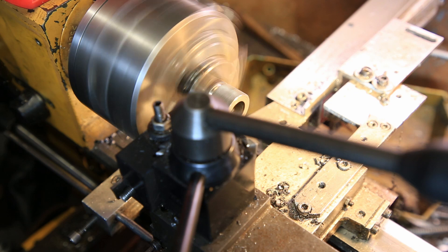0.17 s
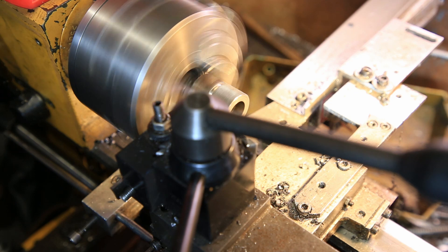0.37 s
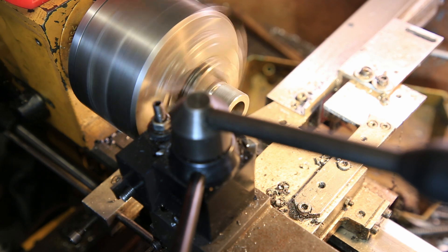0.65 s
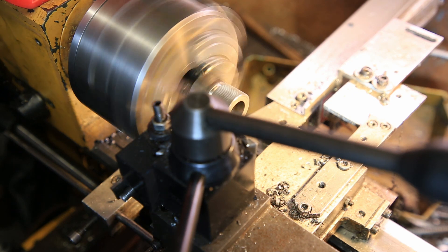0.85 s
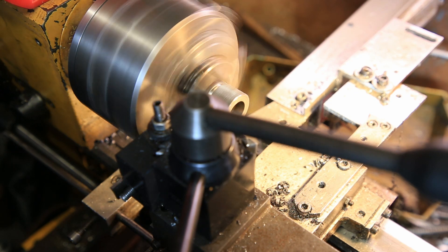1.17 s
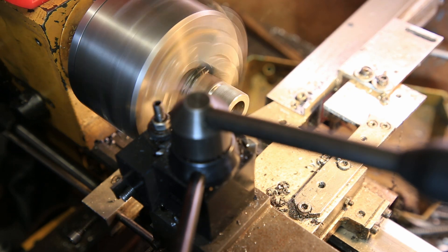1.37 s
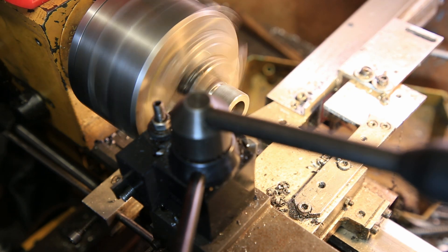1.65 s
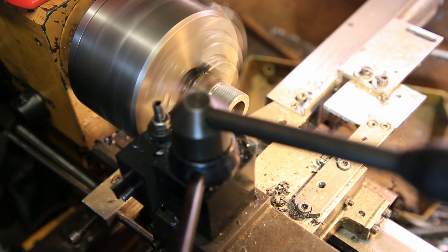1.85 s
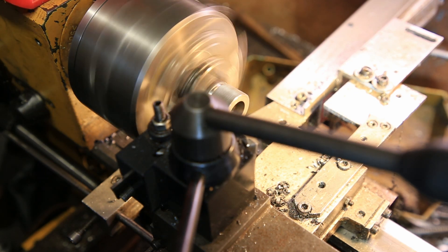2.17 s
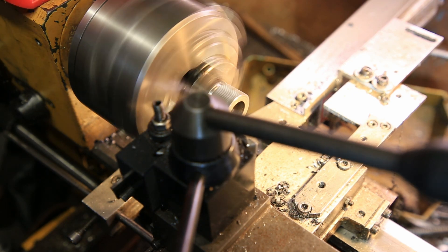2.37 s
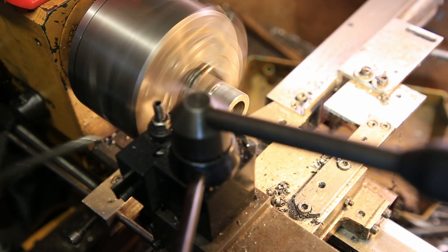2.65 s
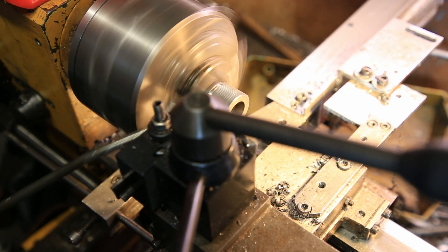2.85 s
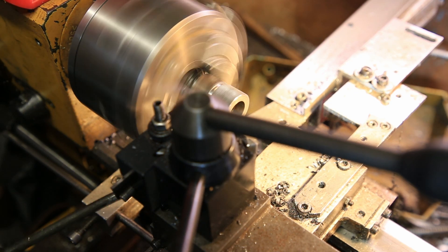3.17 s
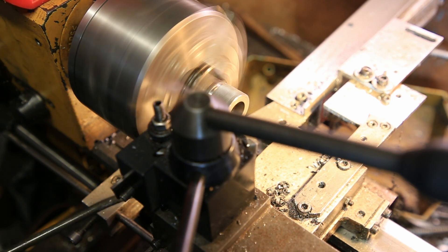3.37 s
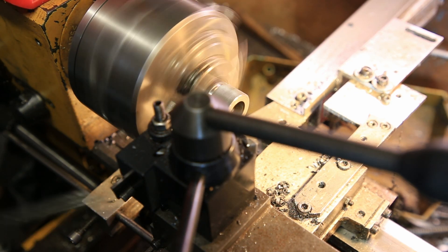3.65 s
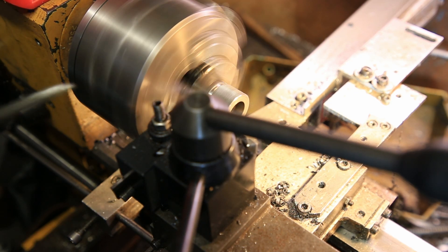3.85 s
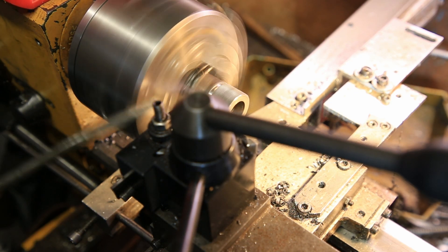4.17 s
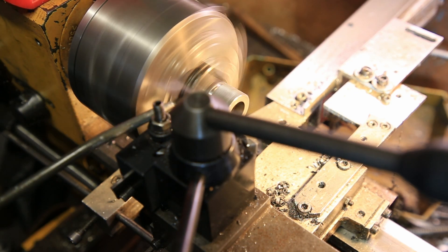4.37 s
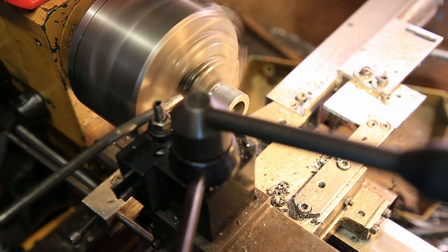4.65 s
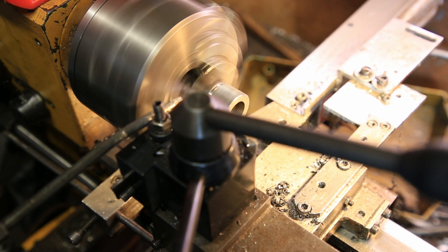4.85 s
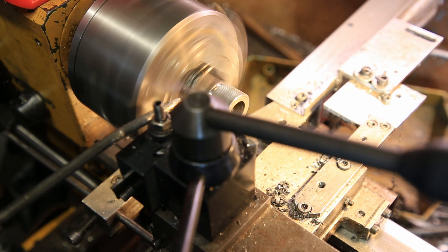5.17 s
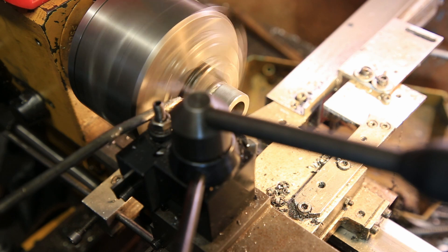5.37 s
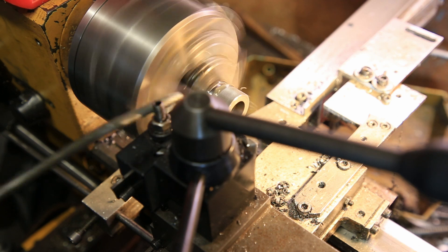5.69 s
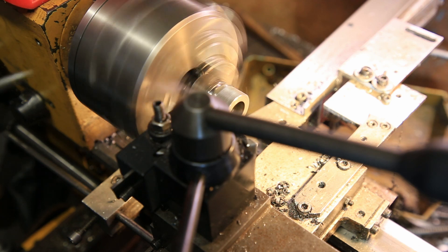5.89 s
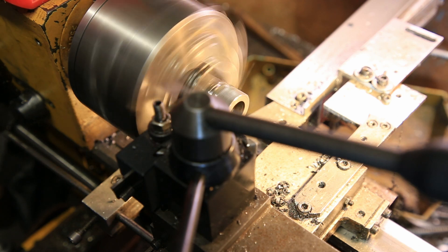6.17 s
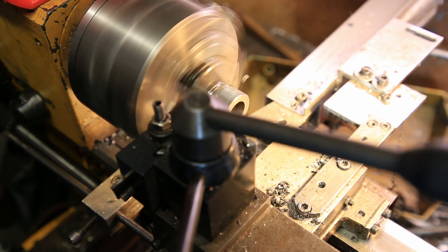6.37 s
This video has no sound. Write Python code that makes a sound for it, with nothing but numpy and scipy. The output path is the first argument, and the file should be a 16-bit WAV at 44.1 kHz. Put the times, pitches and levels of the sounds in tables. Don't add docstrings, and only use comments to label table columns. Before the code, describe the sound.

Steady pitched metal chatter from a turning lathe pulses over motor and gear whirr, thins to nothing, then swells back hard; a steel hook clicks against metal.

```python
import sys
import numpy as np
from scipy import signal
from scipy.fft import rfft, irfft
from scipy.io import wavfile

SR = 44100
rng = np.random.default_rng(int(sys.argv[2]) if len(sys.argv) > 2 else 0)


def elevation(decibels):
    levels = np.asarray(decibels, float)
    return 10 ** (levels / 20)


def transcribe(u):
    v = np.clip(np.atleast_2d(u).T, -1, 1)
    q = np.round(v * 32767).astype(np.int16)
    wavfile.write(sys.argv[1], SR, q)


N = 287538
CHANGE_S = 0.025


def rms_one(x):
    return x / np.sqrt(np.mean(x ** 2) + 1e-20)


def in_time(rows):
    s, *columns = np.transpose(rows)
    return [np.interp(np.arange(N) / SR, s, c) for c in columns]


def drift(rate_hz):
    r = np.exp(-40 * np.pi * rate_hz / SR)
    noise = rng.standard_normal(N // 20 + 3002)
    slow = signal.lfilter([1], [1, -2 * r, r * r], noise)[3000:]
    return np.interp(np.arange(N) / 20, np.arange(len(slow)), rms_one(slow))


def resonate(x, hz, width):
    r = np.exp(-np.pi * width / SR)
    poles = [1, -2 * r * np.cos(2 * np.pi * hz / SR), r * r]
    return signal.lfilter([(1 - r * r) / 2, 0, (r * r - 1) / 2], poles, x)


def hump(hz, centre, width, db):
    return db / (1 + (2 * (hz - centre) / width) ** 2)


def colour(x, spectrum, modes=()):
    hz = np.maximum(np.fft.rfftfreq(N, 1 / SR), 1)
    corner_hz, corner_db = np.transpose(spectrum)
    gain = elevation(np.interp(np.log(hz), np.log(corner_hz), corner_db))
    for centre, width, db in modes:
        gain = gain * elevation(hump(hz, centre, width, db))
    return rms_one(irfft(rfft(x) * gain, N))


def band(x, low_hz, high_hz):
    return signal.sosfilt(signal.butter(2, [low_hz, high_hz], "band", fs=SR, output="sos"), x)


def above(level_db, idle_db):
    idle = elevation(idle_db) ** 2
    return np.sqrt(np.maximum(elevation(level_db) ** 2 - idle, 0.022 * idle))


def throb(sag_db, let_go_db):
    return 0.75 * let_go_db + 0.55 * sag_db


def cut():
    # t/s, tool swing level/dB, bite level/dB, resting f/Hz
    depth = [(0.0, -85, -80, 381.6), (0.17, -54.5, -55, 386), (0.43, -41, -74, 383.5),
             (0.61, -35, -44, 376.0), (0.76, -31.5, -35.5, 378.8), (1.05, -30.5, -32, 378.9),
             (1.32, -27.6, -29, 375.6), (1.59, -32.5, -34.5, 379.5), (2.01, -33, -38.5, 380.4),
             (2.61, -32.5, -38.5, 375.9), (3.1, -34.5, -40, 374.9), (3.72, -35.5, -48.5, 379),
             (4.3, -38.5, -53.5, 377), (4.9, -40, -57.5, 381.3), (5.41, -41, -50, 384.4),
             (5.52, -77, -74, 375.4), (5.96, -58.5, -62.5, 383.6), (6.52, -23.0, -30, 379.3)]
    # t/s, pitch leap f/Hz, swing loss/dB, bite loss/dB
    slips = [(0.098, 4, 15.2, 0), (0.257, 12, 19, 16.6), (0.403, 14.5, 16, 16), (0.525, 11.5, 8.9, 21),
             (0.648, 11.5, 1.5, 1.5), (0.765, 8.5, 1.5, 2), (0.899, -5.0, -1, 3),
             (1.099, -11.5, 6, 7.5), (1.174, 3.5, 0.5, 1.0), (1.243, -8.5, 4.5, 3.5),
             (1.328, 15.5, 3, 2.5), (1.407, -12, 6, 3), (1.496, 2.5, -0.5, 2.5), (1.628, 18.5, 1.5, 5),
             (1.728, 2.5, 0, 1.5), (1.845, 15.5, 0.5, 2), (1.994, 14.5, 4, 5.5), (2.144, 12.5, 4.5, 6),
             (2.268, 3.5, 2, 8.5), (2.417, -3.5, 2, 3.3), (2.503, 16.5, 2.5, 5.5), (2.652, 8, 2, 6),
             (2.797, 17.5, 2.9, 4), (2.932, 7.5, -1.5, 4), (3.051, 18, 2.5, 5.5),
             (3.182, 15.0, 3.5, 9.5), (3.319, 17, 10.5, 11), (3.451, 8, 7, 9), (3.579, 7, 3.5, 4),
                   (3.711, 20, 5.5, 10), (3.842, 10.0, 6.5, 12), (4.011, 7.5, 2.5, 6),
                   (4.135, 4.5, -0.5, 8), (4.232, 10, -2.5, -2), (4.317, -1.8, 2.5, 10),
                   (4.387, 8, 7.7, 11), (4.488, 6, 1, 2), (4.585, 1.1, 4.7, 7), (4.669, 3, 12, 31),
                   (4.773, 5.5, 1.5, 2), (4.963, -0.35, 12, 19.2), (5.011, 14.5, 7.7, 10.5),
                   (5.16, -4.5, 13, 15), (5.283, -4, 28, 39), (5.42, -1, 6, 34), (6.059, -9, 7, 16.9),
                   (6.148, 9.5, -3.5, 7), (6.264, -2, 10.5, 35), (6.401, 2, 20.5, 17),
                   (6.502, 12.5, 16, 7.7)]
    leap_s, lead_s, sag_s, let_go_s = 0.027, 0.0099, 0.02, 0.027
    rebound, rebound_lag_s = 0.2, 0.0558
    swing_db, bite_db, rest_hz = in_time(depth)
    s, leap_hz, sag_db, let_go_db = np.transpose(slips)
    t = np.arange(0, N + 64, 64) / SR

    def bumps(sizes, spread, lag=0):
        shapes = np.exp(-.5 * ((t[:, None] - s - lag) / spread) ** 2)
        return np.interp(np.arange(N) / SR, t, shapes @ sizes)

    leap = bumps(leap_hz, leap_s, -lead_s) - rebound * bumps(leap_hz, leap_s, rebound_lag_s)
    return rest_hz + leap, leap, swing_db, bite_db, bumps(sag_db, sag_s), bumps(let_go_db, let_go_s)


def partial(hz, multiple, flutter_db, wander, under_hz=0):
    # f/Hz, width/Hz, level/dB
    post_modes = [(1477.3, 20, -13), (1854, 10, 6.5), (2188, 79, 11), (2920, 38, 2)]
    slip = wander * drift(16.7) + rng.uniform(0, 2 * np.pi)
    line_hz = multiple * hz - under_hz
    lift_db = sum(hump(line_hz, *mode) for mode in post_modes)
    gain = np.sqrt(2) * elevation(flutter_db * drift(38.5) + lift_db)
    return gain * np.sin(2 * np.pi * np.cumsum(line_hz) / SR + slip)


def chatter(hz, leap, swing_db, bite_db, sag_db, let_go_db):
    # multiple, level/dB, shares of bite, lost bite and lost swing, level per leap/(dB/Hz)
    lopsided = [(2, -38.5, .95, 1.7, 0.01, -.15), (3, -37, .78, 2.2, -.4, .2)]
    # multiple, level over the bite/dB
    upper = [(4, -5), (5, -7.5), (6, -14.5), (7, -14.5), (8, -18), (9, -21), (10, -23), (11, -20),
             (12, -30)]
    # multiple, level over the bite/dB
    bar_lines = [(14, -20), (16, -23.5)]
    # multiple, level/dB
    between = [(1.5, -16), (2.5, -16.5), (3.5, -24)]
    # multiple, level/dB
    beats = [(1, -4), (2, -2.5), (3, -12.5), (4, -3.5)]
    # t/s, uneven bites level/dB, motor beat level/dB
    stray = [(.08, -68, -70), (.19, -48, -68), (.3, -58, -75), (.6, -68, -70), (.9, -51, -71),
             (1.4, -47, -66), (1.66, -29, -69), (2.14, -51, -51), (3.03, -37, -45.5), (3.3, -55, -50),
             (5.5, -87, -65.5)]
    fresh_db = {2: -3, 3: -3.5, "upper": 3.5}
    motor_hz = 100.6
    worn_in_s, fresh_again_s = 1.08, 6.32
    stall_db, stall_share = -35, 0.27
    clear_db, fade_from_db, fade_share = 1.44, -38, 1.1
    upper_hold, bar_hold = 0.35, 0.6
    uneven_db, beat_db = in_time(stray)
    t = np.arange(N) / SR
    fresh = 1 + (np.tanh((t - fresh_again_s) / CHANGE_S) - np.tanh((t - worn_in_s) / CHANGE_S)) / 2

    flutter = 1.2 + .09 * np.clip(-33 - swing_db, 0, 25)
    out = elevation(swing_db - sag_db) * partial(hz, 1, flutter_db=flutter, wander=.25)
    for multiple, db, bite, let_go, sag, per_hz in lopsided:
        level_db = db + bite * (bite_db + 39) - let_go * let_go_db - sag * sag_db + per_hz * leap
        level_db += fresh_db[multiple] * fresh + stall_share * np.minimum(swing_db - stall_db, 0)
        gain = elevation(level_db)
        if multiple == 3:
            gain = np.hypot(gain, fresh * elevation(swing_db - 1.6 * sag_db - 11))
            gain *= elevation(3.5 * fresh * (t > N / SR / 2))
        out += gain * partial(hz, multiple, flutter_db=1.5, wander=.35)

    force_db = bite_db - throb(sag_db, let_go_db)
    upper_db = force_db + clear_db + np.minimum(force_db - fade_from_db, 0) * fade_share
    for multiple, db in upper:
        gain = elevation(upper_db + db + fresh_db["upper"] * fresh * (multiple < 6))
        out += gain * partial(hz - upper_hold * leap, multiple, flutter_db=2.6 - 1.3 * fresh,
                              wander=(.14 - .05 * fresh) * multiple)
    for multiple, db in bar_lines:
        line = partial(hz - bar_hold * leap, multiple, flutter_db=4, wander=2.2)
        out += elevation(upper_db + db + 3) * line
    for multiple, db in between:
        line = partial(hz, multiple, flutter_db=3.5, wander=0.9)
        out += above(uneven_db, idle_db=-63) * elevation(db) * line
    for multiple, db in beats:
        line = partial(hz, multiple, flutter_db=3.5, wander=0.51, under_hz=motor_hz)
        out += above(beat_db, idle_db=-64.5) * elevation(db) * line
    return out


def rattle(hz, leap, swing_db, bite_db, sag_db, let_go_db):
    # f/Hz, level per Hz/dB
    rattle_body = [(90, -23), (180, -8.5), (330, -9.5), (500, -1.5), (900, 1.5), (1700, 2.5), (2600, -3),
                   (3600, -6.5), (6300, -13), (7200, -13), (11000, -30), (13300, -51), (14000, -60)]
    # f/Hz, width/Hz, level/dB
    slide_modes = [(724, 32, 12.5), (1131, 63, 10.5), (1607, 18, 8.5), (2140, 15, -12.5), (2483, 260, 7.5),
                   (2893, 11, 5), (4020, 34, 5), (8440, 420, 6), (11250, 340, -6), (12900, 400, -3)]
    # f/Hz, width/Hz, level/dB
    bar_modes = [(5210, 40, 9.5), (5300, 94, -14), (6000, 590, 0), (6120, 530, 17), (8500, 360, -34),
                 (11200, 500, -17), (12850, 450, -30)]
    # f/Hz, width/Hz, level/dB
    post_ring = [(2204, 45, -1), (2970, 31, -2), (4060, 60, -15)]
    lag_s, wavy_from_s = 0.12, 1.1
    bar_db, post_db = -48.5, -50.5
    keep = np.exp(-1 / (lag_s * SR))
    shake_db = 0.5 * (bite_db + 38) + 0.31 * (swing_db + 33)
    rattle_db = -46.5 + shake_db[0] + signal.lfilter([1 - keep], [1, -keep], shake_db - shake_db[0])
    throb_db = 3.5 - throb(sag_db, let_go_db)
    shear = rng.standard_normal(N) * (1 + 0.48 * np.cos(2 * np.pi * np.cumsum(hz) / SR))
    slides = elevation(8 + 0.51 * throb_db + 1.8 * drift(27.0)) * colour(shear, rattle_body, slide_modes)
    slides *= above(rattle_db, idle_db=-61.5)

    bar, post = np.zeros(N), np.zeros(N)
    for mode_hz, width, db in bar_modes:
        sign = -1 if 7000 < mode_hz < 10000 else 1
        bar += sign * elevation(db) * resonate(shear, mode_hz, width) / np.sqrt(width)
    low_pass = signal.butter(10, 13200, fs=SR, output="sos")
    bar = rms_one(signal.sosfilt(low_pass, band(bar, 3800, 12400)))
    for mode_hz, width, db in post_ring:
        post += elevation(db) * rms_one(resonate(resonate(shear, mode_hz, width), mode_hz, width))
    wavy = np.clip((np.arange(N) / SR - wavy_from_s) / CHANGE_S, 0, 1)
    post *= elevation(post_db - bar_db) * wavy
    return slides + elevation(bar_db + 1.17 * (bite_db + 33.5) + 1.1 * throb_db) * (bar + post)


def hook_taps():
    # t/s, peak level/dB, ring f/Hz, ring level/dB, bright level/dB
    taps = [(3.0425, -23, 3626, -17, -23), (3.0445, -18, 8010, -19, -25), (3.047, -19.5, 4450, -9, -23),
            (3.0855, -16.5, 3500, -11, -22), (3.094, -23, 6970, -5, -14), (3.099, -29, 4770, 5, -18),
            (3.192, -23.5, 4266, -9, -18), (3.3892, -8, 4140, -15.5, -31), (3.4037, -16, 6050, -9, -15),
            (3.541, -23, 6800, -17, -20), (3.565, -29, 11500, -24, -16), (3.706, -25, 4230, -10.5, -24),
            (4.268, -40, 6960, -5, -8), (4.838, -25.5, 5760, -12, -12.5), (5.703, -30, 3130, -5.5, -10.5),
            (5.704, -41, 6190, 2, -20), (5.7244, -28.5, 6640, -13, -22), (5.7608, -42, 3100, -5, -4),
            (5.771, -46, 3100, 10, -20), (5.797, -48, 6090, 3, -20), (2.684, -41, 2387, -10, -30)]
    # t/s, level/dB, f/Hz, t60/s
    thuds = [
        (2.685, -29, 1260, .03),
        (3.086, -28, 889, 0.04),
        (3.089, -39, 192, 0.063),
        (3.404, -26, 777, 0.028),
        (5.7255, -43.5, 628.8, .04),
    ]
    # t/s, level/dB
    scrape = [
        (3.55, -80),
        (3.58, -46.5),
        (3.64, -54),
        (3.69, -56),
        (3.70, -80),
    ]
    out, t = np.zeros(N), np.arange(4000) / SR
    for s, peak_db, ring_hz, ring_db, bright_db in taps:
        t60 = np.clip(.032 + .0004 * (peak_db + 25), .005, .15)
        dying = elevation(-60 * t / t60)
        noise = rng.standard_normal(len(t)) * dying * 0.72
        tap = elevation(bright_db + 12) * band(noise, 8450, 11800)
        noise[0] = 3.9
        tap += band(band(noise, 1440, 7800), 1050, 12600)
        tap += elevation(-11.5) * band(noise, 500, 1600)
        tap += elevation(ring_db - 0.5) * np.sin(2 * np.pi * ring_hz * t) * dying ** 0.79
        tap += elevation(ring_db + 14) * resonate(noise, ring_hz, 330)
        out[round(s * SR):][:len(t)] += elevation(peak_db - 4.0) * tap
    for s, db, hz, t60 in thuds:
        knock = np.sin(2 * np.pi * hz * t) + 3 * rng.standard_normal(len(t))
        out[round(s * SR):][:len(t)] += band(elevation(db - 60 * t / t60) * knock, hz / 2, hz * 2)
    grit = rng.standard_normal(N) * elevation(3.1 * drift(60))
    rub = rms_one(resonate(grit, 4160, 200) + 0.15 * band(grit, 4500, 5600))
    return out + elevation(in_time(scrape)[0]) * rub


def drive():
    # f/Hz, level per Hz/dB
    idle_spectrum = [(13, -44), (22, -19), (100, -13), (199, -4), (235, 0), (598, -0.5), (954, -1),
                     (1040, -3.5), (1440, 0.5), (2870, -5), (3120, -6), (4710, -11), (7940, -13),
                     (11400, -29.5), (15650, -41), (15850, -70)]
    # t/s, level/dB
    load_swell = [
        (0, -5),
        (.1, 3),
        (5.2, 2),
        (5.27, -2.5),
        (5.34, 2.5),
        (5.55, -6.5),
        (5.62, -1.5),
        (5.9, 0.5),
        (6.52, 6.5),
    ]
    # f/Hz, width/Hz, level/dB
    gear_tones = [(103.4, 12.6, -73.5), (923, 66, -64), (1464, 74, -61.5), (3090, 120, -63.5),
                  (9820, 250, -68.5), (10130, 140, -70.5), (10420, 150, -76)]
    shaft_hz = 23.4
    swell_db, = in_time(load_swell)
    gain = elevation(-51.5 + swell_db + 1.8 * drift(5.4))
    out = gain * colour(rng.standard_normal(N), idle_spectrum)
    for hz, width, db in gear_tones:
        gain = elevation(db + 1.06 * drift(14))
        out += gain * rms_one(resonate(resonate(rng.standard_normal(N), hz, width), hz, width))
    turn = (1.7 + np.cos(2 * np.pi * shaft_hz * np.arange(N) / SR + 3.3 * drift(2.7))) ** 2
    hiss_gain = elevation(-78 + 0.29 * drift(1.6)) * turn
    return out + hiss_gain * rms_one(band(rng.standard_normal(N), 7460, 8860))


def stand_rumble():
    # t/s, length/s, level/dB
    nudges = [
        (0.296, 0.43, -70),
        (0.996, .4, -79),
    ]
    t, deep = np.arange(N) / SR, rms_one(band(rng.standard_normal(N), 22, 49))
    envelope = np.zeros(N)
    for s, length, db in nudges:
        inside = (t > s) * (t < s + length)
        envelope += elevation(db) * inside * elevation(-8 * (t - s).clip(0) / length)
    return deep * envelope


def scene():
    controls = cut()
    return (chatter(*controls) + rattle(*controls) + hook_taps() + drive() + stand_rumble())[None]


def roll_off(x):
    return signal.sosfilt(signal.butter(12, 16820, fs=SR, output="sos"), x)


def record(dry):
    hiss = elevation(-71.5) * rng.standard_normal(dry.shape)
    hiss = signal.sosfilt(signal.cheby2(18, 50, 15950, fs=SR, output="sos"), hiss)
    dulled = signal.sosfilt(signal.cheby2(10, 24, 15900, fs=SR, output="sos"), dry)
    return roll_off(dulled + hiss)


dry = scene()
out = record(dry)
transcribe(out)
```